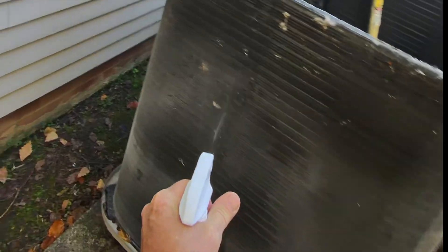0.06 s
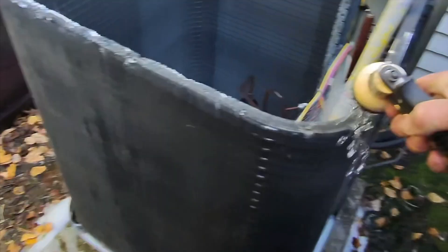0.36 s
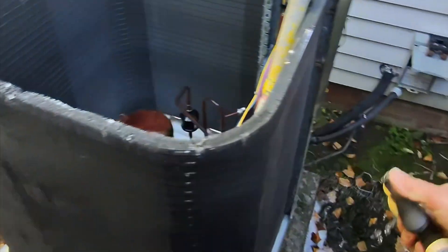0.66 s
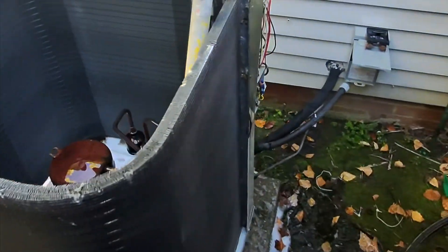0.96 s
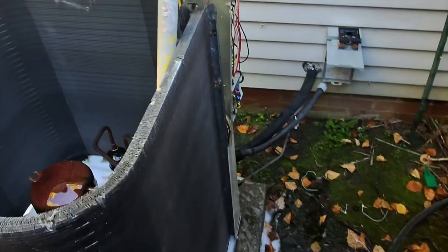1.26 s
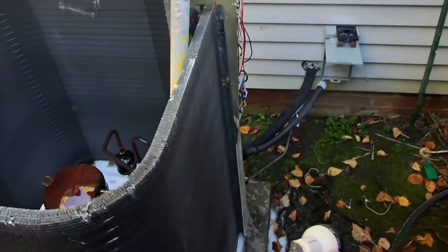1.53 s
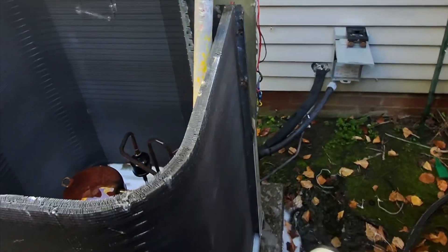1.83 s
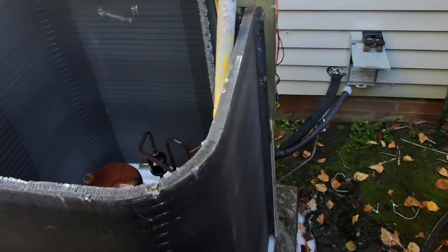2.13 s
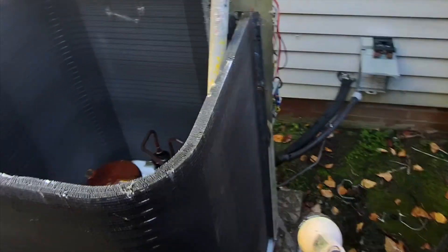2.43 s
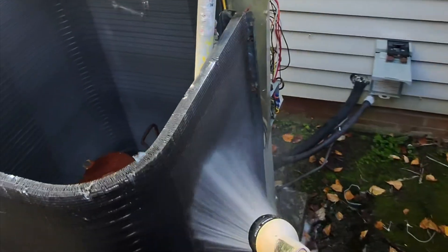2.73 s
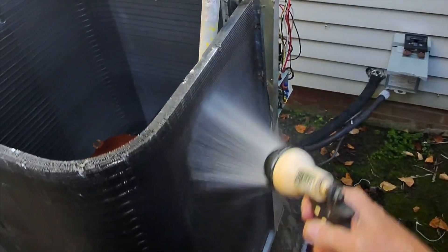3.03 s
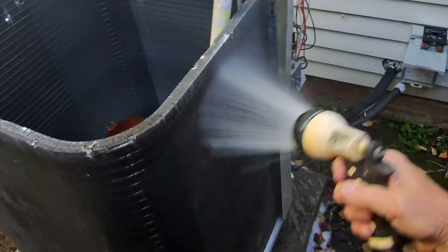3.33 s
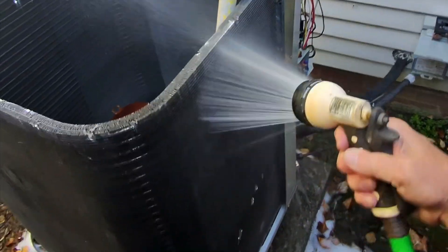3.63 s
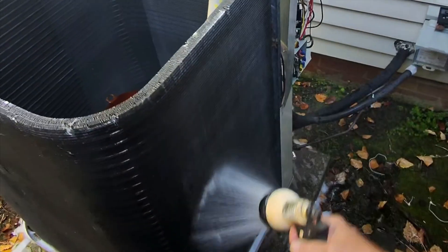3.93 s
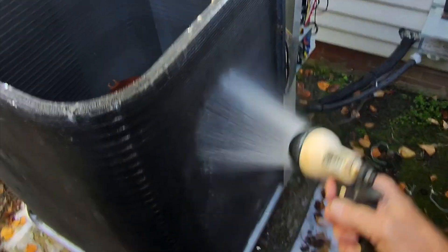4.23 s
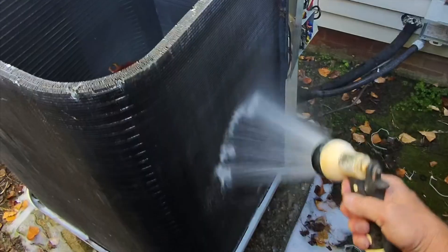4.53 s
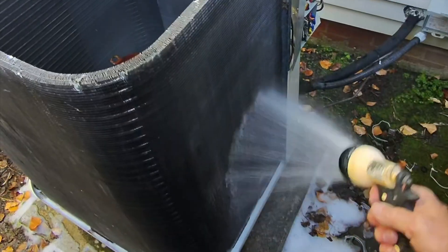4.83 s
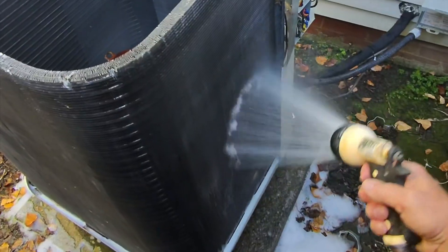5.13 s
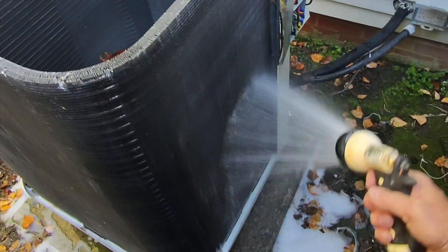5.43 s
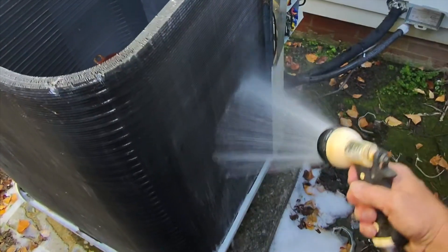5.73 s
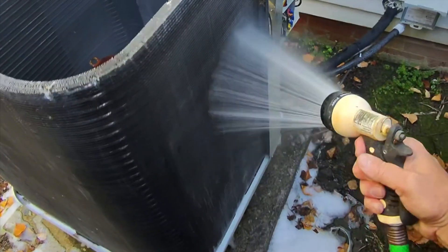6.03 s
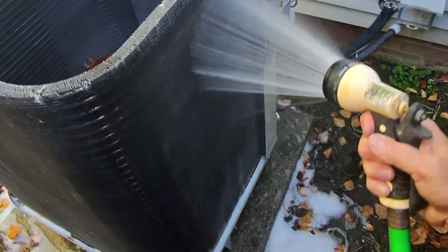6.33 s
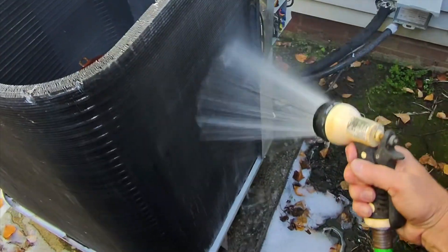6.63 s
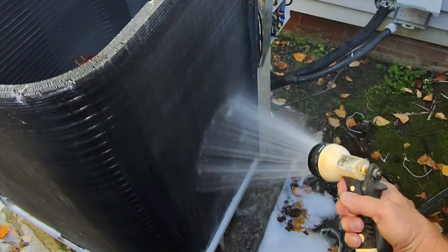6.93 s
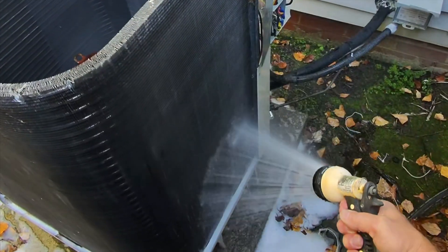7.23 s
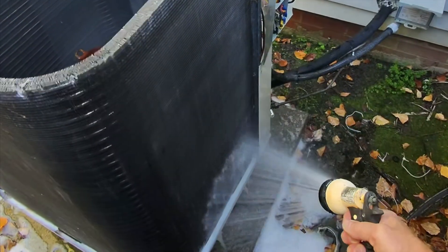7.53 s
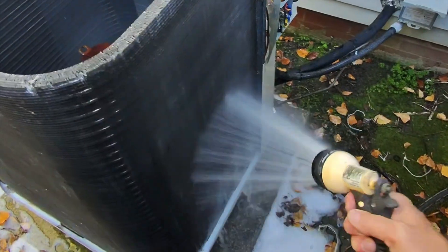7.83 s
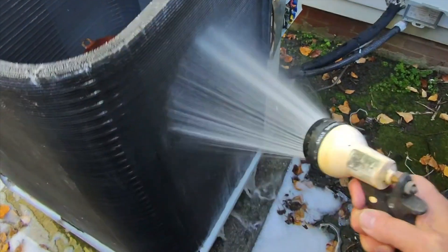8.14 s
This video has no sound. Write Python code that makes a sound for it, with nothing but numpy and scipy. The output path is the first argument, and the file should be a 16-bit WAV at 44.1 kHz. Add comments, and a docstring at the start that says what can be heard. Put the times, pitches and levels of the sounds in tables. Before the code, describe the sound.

A spray bottle sputters twice, water drips, then a garden hose nozzle hisses steadily against the metal fins of an air conditioner coil.

```python
"""A trigger bottle sputters cleaner onto an outdoor air conditioner coil in two squeezes.
The wet coil and the shut hose nozzle trickle and drip; the nozzle knocks as it is picked up.
Then it opens and its fan of water sweeps the thin metal fins, swelling as it strikes them harder:
drops drum, splash and atomise, and the coil rings with a hollow note.
Behind it all, an autumn yard: crickets' wing strokes and a distant rumble."""
import sys
import numpy as np
from scipy import signal
from scipy.fft import rfft, irfft, next_fast_len
from scipy.io import wavfile
from scipy.ndimage import uniform_filter1d

SR = 44100
rng = np.random.default_rng(int(sys.argv[2]) if len(sys.argv) > 2 else 0)


def unload_wav(signal):
    """Save mono or channel-first audio to the path in sys.argv[1] as 16-bit WAV at rate SR, clipped to [-1, 1]."""
    wavfile.write(
        sys.argv[1],
        SR,
        np.round(np.clip(np.atleast_2d(signal).T, -1, 1) * 32767).astype(np.int16),
    )


N = 364707

# Noise spectra: f/Hz, relative density/dB
YARD_SPECTRUM = [(15, -42), (25, -26), (40, -24), (62, -2.5), (85, -0.5), (150, -1), (200, -10),
                 (270, -6.5), (380, -8.5), (500, -10.5), (900, -14), (1400, -17), (2000, -27), (5000, -28),
                 (15000, -55)]
TRICKLE_SPECTRUM = [(700, -22), (2000, -14.5), (3000, -8.5), (4600, -4.5), (5500, -3), (6700, 1.5),
                    (7400, -4.5), (8300, -12), (12000, -19.5), (16000, -19.5)]
BOTTLE_SPECTRUM = [(300, -16), (900, -12), (1150, -5), (1330, -3), (1600, -1.5), (2400, -8), (3100, 0.5),
                   (4700, -6), (6800, 5), (8400, -11), (12000, -15), (16000, -25)]
SPIT_SPECTRUM = [(500, -14), (1500, -3.5), (3000, -6), (5000, -10), (6900, 5.5), (8500, -3), (12000, -8.5),
                 (16000, -10)]
ROAR_SPECTRUM = [(300, -39), (900, -39), (1400, -12), (1700, -3), (2200, -0.5), (2500, 0.5), (2900, -2),
                 (3400, 1), (4200, -2), (5100, -12), (7000, -12.5), (12000, -45)]
SIZZLE_SPECTRUM = [(1500, -26.5), (3500, -16), (4700, -7.5), (5200, -7), (5700, -1), (6150, -2), (6600, .5),
                   (7400, -3), (8200, -14), (9300, -15), (12000, -21), (16000, -35)]
MIST_SPECTRUM = [(4000, -7.5), (7500, 5.5), (9200, 3), (11000, 0.5), (12200, 0.5), (13500, 3.5),
                 (14900, 3.5), (16000, 3)]
SKIM_SPECTRUM = [(2000, -27.5), (3600, -4.5), (4500, 2), (5200, 3.5), (6200, -11), (9000, -27)]
PATTER_SPECTRUM = [(100, -23), (260, -20), (370, -1), (520, -10.5), (700, -2.5), (850, 1), (1400, 4.5),
                   (2500, -17), (6000, -32)]
# Left-right likeness: f/Hz, correlation
YARD_CORRELATION = [(60, 0.98), (130, 0.95), (290, 0.85), (640, -0.25), (1400, -0.048), (15000, 0)]
JET_CORRELATION = [(60, 0.5), (130, 0.93), (290, 0.85), (640, 0.87), (1410, 0.68), (3100, 0.53),
                   (6820, 0.37), (15000, 0.083)]
# Cricket trills: stroke rate/Hz, top f/Hz, end f/Hz, level/dB, start t/s
CRICKET_TRILLS = [(27, 5720, 5380, -51.5, .38), (27, 6450, 6130, -52.5, .38), (9.2, 4900, 4740, -60.5, .38),
                  (31, 6950, 6500, -60, 0)]
# Far cricket's chirps: t/s, level/dB
CRICKET_CHIRPS = [(.062, -49.5), (.172, -51.5), (1.365, -53.5), (1.575, -50), (1.68, -54.5), (1.885, -49.5),
                  (1.99, -49.5)]
# Clear drips: t/s, level/dB, f/Hz
CLEAR_DRIPS = [(.0207, -40, 1580), (0.0405, -35.5, 1490), (0.21, -41.5, 2900), (.508, -44, 3740),
               (.577, -43, 3050), (.6464, -45, 3350), (1.4097, -41.5, 2700), (1.6142, -41, 3260),
               (1.678, -42, 2870), (1.7233, -43, 3660), (1.844, -43, 3600), (1.9385, -42.5, 3690)]
# Nozzle modes: f/Hz, level/dB, t60/s
NOZZLE_MODES = [(335, -34, .025), (720, -49, .025), (1340, -43, .03), (2350, -43, .028)]
# Trigger squeezes: start t/s, hardest t/s, end t/s, first gap/s, top spurt gain/dB, mist level/dB
TRIGGER_SQUEEZES = [(.0024, 0, 0.042, .019, -22, -43), (0.2347, 0.343, .368, .0123, -17.5, -46)]
# Force of the sweeping jet on the fins: t/s, level/dB
JET_STRIKE = [(2.15, -32.5), (2.67, -27), (2.77, -32), (2.91, -27.5), (3.09, -30.5), (3.21, -27.5),
              (3.43, -30.0), (3.59, -34.5), (3.85, -25.5), (4.05, -29), (4.19, -33.0), (4.29, -33),
              (4.45, -29), (4.57, -28), (4.83, -33), (5.13, -27.5), (5.33, -31.0), (5.73, -27.5),
              (6.07, -27.5), (6.51, -32.0), (7.21, -35.0), (7.31, -32.5), (7.41, -28), (7.89, -30.5),
              (8.13, -35), (8.27, -35.5)]
# Jet parts by name: base level/dB, slope/(dB per dB of strike), grazing offset/dB
JET_PARTS = {"roar": (-33.5, 1.16, -2.1), "sizzle": (-33, 1.0, -1.5), "skim": (-41, 0.46, 6),
             "ring": (-32, 0.89, 1), "undertone": (-66, 0, 5.9), "patter": (-51, -0.13, -1.2)}
# Tilt from roar towards sizzle: t/s, level/dB
SIZZLE_TILT = [(2.15, .8), (3.1, -2), (3.42, 0), (3.7, -2), (4.05, 0.8), (4.55, 1.2), (5.4, -0.1),
               (6.9, 0.5), (7.42, 1.3), (7.6, -0.8), (8.27, -0.5)]
# Fine mist: t/s, relative level/dB
MIST_CURVE = [(2.15, -42), (2.33, -37), (2.73, -44), (3.27, -47), (3.43, -38.5), (3.53, -43.5),
              (3.69, -40.5), (3.79, -44.5), (4.13, -41.5), (4.21, -44.5), (5.87, -46.0), (6.91, -43),
              (8.27, -46.0)]
# Coil's hollow note, shifting as the jet moves: t/s, f/Hz, level/dB
HOLLOW_NOTE = [(2.15, 1190, -50.5), (2.75, 1148, -46.5), (2.92, 1083, -51.5), (3.17, 1083, -47),
               (3.45, 1010, -53.5), (3.75, 1113, -50.5), (4.25, 1070, -50), (4.52, 1095, -54),
               (4.8, 1070, -50), (5.2, 1103, -53.5), (6.05, 1095, -53.5), (6.35, 1047, -51.5),
               (6.72, 1118, -48), (7.7, 1126, -52.5), (8.27, 1110, -53)]
# Coil's brighter ring: t/s, relative level/dB
RING_CURVE = [(2.15, -9.5), (2.59, -15), (2.73, -6), (2.97, -14.5), (4.27, -12), (4.71, -15), (5.33, -15.5),
              (5.53, -8.5), (5.67, -10.5), (5.83, -8), (5.93, -10), (7.23, -18), (7.63, -9), (8.27, -22)]
# Panel's low drumming: t/s, relative level/dB
DRUM_CURVE = [(2.15, -75), (2.31, -52.5), (3.07, -56.5), (3.41, -50.5), (4.17, -63), (4.87, -57),
              (5.31, -59.5), (6.17, -52), (6.89, -63.5), (7.37, -51.5), (7.83, -67), (8.27, -74)]
# Microphone port notch: f/Hz, gain/dB
PORT_NOTCH = [(9400, 0), (10000, -5.5), (10400, -11), (10900, -4.5), (11800, 2)]

RUNOFF_S, KNOCK_S, LEAK_S, OPEN_S = .37, 1.532, 2.035, 2.105  # onsets
GRAZE_UNTIL_S, SQUARE_FROM_S = 2.6, 3.8  # the jet turns to face the fins
TIME_S = np.arange(N) / SR


def amp(db):
    """Decibels to gain."""
    return 10 ** (np.asarray(db) / 20)


def unit_rms(x):
    """Scale to rms 1."""
    return x / np.sqrt(np.mean(x ** 2) + 1e-20)


def unit_mid(pair):
    """Scale a stereo pair to mid rms 1."""
    return pair / np.sqrt(np.mean(pair.mean(0) ** 2) + 1e-20)


def at_hz(points, hz):
    """Interpolate over log frequency."""
    f, value = np.transpose(points)
    return np.interp(np.log(hz + 1), np.log(f + 1), value)


def curves(rows):
    """Each value column of a time table, per sample."""
    times_s, *columns = np.transpose(rows)
    return [np.interp(TIME_S, times_s, column) for column in columns]


def add(mix, start_s, sound):
    """Mix a sound in at start_s."""
    part = mix[:, max(round(start_s * SR), 0):][:, :sound.shape[-1]]
    part += sound[..., :part.shape[1]]


def pan(left_db):
    """Left and right gains."""
    return amp([[left_db / 2], [-left_db / 2]])


def colour(pair, spectrum, correlation=None):
    """Filter a pair by a spectrum; optionally correlate its sides."""
    n = pair.shape[1]
    size = next_fast_len(n + 2048)
    hz, z = np.fft.rfftfreq(size, 1 / SR), rfft(pair, size)
    if correlation is not None:
        c = np.clip(at_hz(correlation, hz), -1, 1)
        z = np.array([z[0], c * z[0] + np.sqrt(1 - c ** 2) * z[1]])
    return irfft(z * amp(at_hz(spectrum, hz)), size)[:, :n]


def wobble(rate_hz):
    """Smooth random curve, rms 1."""
    knots = rng.standard_normal(8192)
    return unit_rms(np.interp(TIME_S * rate_hz, np.arange(len(knots)), knots))


def ringing(x, hz, width_hz):
    """Two resonators in series, mid rms 1; hz may be a curve."""
    turn = np.exp(2j * np.pi * np.cumsum(hz * np.ones(x.shape[-1])) / SR)
    pole = np.exp(-np.pi * width_hz / SR)
    for _ in range(2):
        x = 2 * (turn * signal.lfilter([1 - pole], [1, -pole], x / turn + 1e-18)).real
    return unit_mid(x)


def droplets(per_s, spread_db, wash):
    """Tiny uneven impacts over the wash of countless smaller ones."""
    sizes = amp(spread_db * np.minimum(rng.exponential(1, (2, N)), 5))
    hits = sizes * rng.choice([-1, 1], (2, N)) * (rng.random((2, N)) < per_s / SR)
    return unit_rms(unit_rms(hits) + wash * rng.standard_normal((2, N)))


def patchy(pair, brief_db, lasting_db=0.):
    """Water gathers and breaks in brief wide-band patches; struck spots add narrow, longer ones."""
    z = signal.stft(pair, nperseg=512)[2]
    brief, lasting = rng.standard_normal((2,) + z.shape[1:])
    brief = uniform_filter1d(uniform_filter1d(brief, size=6, axis=0), size=6, axis=1)
    lasting = uniform_filter1d(uniform_filter1d(lasting, size=2, axis=0), size=40, axis=1)
    gain = amp(brief_db * unit_rms(brief) + lasting_db * unit_rms(lasting))
    return signal.istft(z * gain, nperseg=512)[1][:, :N]


def yard(level_db=-52):
    """Neighbourhood rumble, nearly alike in both ears."""
    swell = amp(.35 * wobble(3.3))
    rumble = colour(rng.standard_normal((2, N)), YARD_SPECTRUM, YARD_CORRELATION)
    return unit_mid(rumble) * amp(level_db) * swell


def trill(rate_hz, top_hz, end_hz, db, start_s, duty=.75):
    """Cricket wing strokes: each a thin note, falling as the wing slows."""
    strokes = np.cumsum(rate_hz * (1 + .07 * wobble(25))) / SR
    progress = np.minimum(strokes % 1 / duty, 1)
    hz = end_hz + (top_hz - end_hz) * (1 - progress) ** 2 + 40 * wobble(500)
    envelope = np.sin(np.pi * progress) * amp(db + 2.2 * wobble(110))
    return np.sin(2 * np.pi * np.cumsum(hz) / SR) * envelope * (TIME_S > start_s)


def crickets(chirp_hz=5080, scatter_db=-6):
    """Trills and chirps, scattered by house wall and ground."""
    song = np.tile(sum(trill(*row) for row in CRICKET_TRILLS), (2, 1))
    t = np.arange(0, .035, 1 / SR)
    chirp = np.hanning(len(t)) ** .5 * np.sin(2 * np.pi * chirp_hz * t)
    for start_s, db in CRICKET_CHIRPS:
        add(song, start_s, amp(db) * chirp)
    echoes = rng.standard_normal((2, 3000)) * np.exp(-TIME_S[:3000] / .006)
    scattered = signal.fftconvolve(song, echoes, axes=1)[:, :N]
    return song + amp(scatter_db) * unit_rms(scattered) * song.std()


def runoff(gush_db=-52, trickle_db=-51, settle_s=.27, dribble_db=-55.5):
    """Streams gush off the coil and settle to a trickle; the shut nozzle dribbles on the soil."""
    age_s = np.maximum(TIME_S - RUNOFF_S, 0)
    onset = np.minimum(age_s / .017, 1)
    flow = (amp(trickle_db) + amp(gush_db) * np.exp(-age_s / settle_s)) * amp(1.5 * wobble(90))
    water = unit_mid(colour(patchy(droplets(900, 2.0, .98), brief_db=3.5), TRICKLE_SPECTRUM))
    dribble = ringing(droplets(120, 1.7, .26), hz=298, width_hz=120)
    dribble_flow = amp(dribble_db) * np.exp(-.5 * ((TIME_S - .5) / .2) ** 2)
    return onset * (water * flow + dribble * dribble_flow)


def drip(db, hz, tick_db=-8):
    """A short wet plip and a tick of splash, slightly off centre."""
    t = TIME_S[:3000]
    burst, splash = rng.standard_normal((2, 2, len(t)))
    plip = ringing(burst, hz, width_hz=.26 * hz) * np.minimum(t / .0019, 1) * np.exp(-t / .0061)
    splash = colour(splash, [(1000, -18), (4000, -9), (6500, 18), (9000, -10), (15000, -15)])
    tick = unit_mid(splash) * np.exp(-t / .0055)
    return amp(db) * (plip + amp(tick_db) * tick) * pan(rng.normal(0, 2.5))


def drips(faint_per_s=4, faint_db=-52, faint_hz=3700):
    """Clear drips, plus faint random ones while the nozzle is shut."""
    out = np.zeros((2, N))
    for start_s, db, hz in CLEAR_DRIPS:
        add(out, start_s, drip(db, hz))
    for slot_s in np.arange(RUNOFF_S, OPEN_S, 1 / faint_per_s):
        start_s = slot_s + rng.random() / faint_per_s
        add(out, start_s, drip(faint_db + rng.normal(0, 1.8), faint_hz * np.exp(rng.normal(0, .1))))
    return out


def knock():
    """Damped modes of the plastic nozzle as it is picked up."""
    out, t = np.zeros((2, N)), TIME_S[:SR // 5]
    for hz, db, t60_s in NOZZLE_MODES:
        add(out, KNOCK_S, amp(db - 60 * t / t60_s) * np.sin(2 * np.pi * hz * t))
    return out


def spurt(spit_db=-7.6, spatter_db=-19):
    """One bottle spurt: soft puff, sharp spit, short spatter."""
    t = np.arange(-.006, .04, 1 / SR)
    age_s = np.maximum(t, 0)
    spit = np.minimum(age_s / .00025, 1) * np.exp(-np.maximum(age_s - .001, 0) / .00072)
    spatter = (t > -.0035) * np.exp(-age_s / .0097)  # early start gives the puff
    sharp, soft = rng.standard_normal((2, 2, len(t)))
    return (amp(spit_db) * spit * unit_mid(colour(sharp, SPIT_SPECTRUM))
            + amp(spatter_db) * spatter * unit_mid(colour(soft, BOTTLE_SPECTRUM)))


def bottle(foam_db=-56.5, gap_growth_s=.00193, build_db_per_s=100, slack_db_per_s=230):
    """Squeezes blow mist and stutter, slower and harder until the finger slackens; foam fizzes between."""
    spurts = np.zeros((2, N))
    flow = amp(foam_db) * (TIME_S < RUNOFF_S)
    for start_s, hardest_s, end_s, gap_s, top_db, mist_db in TRIGGER_SQUEEZES:
        rise = np.clip((TIME_S - start_s) / .03 + .5, 0, 1)
        fall = np.exp(-np.maximum(TIME_S - end_s, 0) / .018)
        flow = np.maximum(flow, amp(mist_db) * rise * fall)
        at_s = start_s
        while at_s < end_s:
            db = top_db - max(build_db_per_s * (hardest_s - at_s), slack_db_per_s * (at_s - hardest_s))
            add(spurts, at_s - .0055, amp(db) * spurt())
            at_s += gap_s
            gap_s += gap_growth_s
    fizz = unit_mid(colour(droplets(4600, 2.5, .75), BOTTLE_SPECTRUM))
    return (spurts + flow * fizz) * pan(1.9)


def coil(gain, ring_hz=1784, drum_hz=286, undertone_ratio=.625):
    """Drops drive the coil and panel resonances; the coil's pitches shift as the jet moves."""
    hollow_hz, hollow_db = curves(HOLLOW_NOTE)
    ring_bend = (hollow_hz / hollow_hz.mean()) ** .37
    drive = colour(droplets(4000, 2.1, .63), [(100, 8), (1400, -20.5), (4000, 13)], JET_CORRELATION)
    hollow = ringing(drive, hollow_hz, width_hz=128) * amp(hollow_db + wobble(9))
    undertone = ringing(drive, undertone_ratio * hollow_hz, width_hz=33) * gain["undertone"]
    ring = ringing(drive, ring_hz * ring_bend, width_hz=280) * gain["ring"] * amp(curves(RING_CURVE)[0])
    drum = ringing(drive, drum_hz, width_hz=156) * amp(curves(DRUM_CURVE)[0] - .5)
    return hollow * pan(-5) + undertone + ring * pan(7.2) + drum


def jet_band(drops, spectrum):
    """Drop noise with the jet's stereo width, mid rms 1."""
    return unit_mid(colour(drops, spectrum, JET_CORRELATION))


def jet(usual_strike_db=-30, opening_s=.041, leak_db=-12):
    """The fan of water drums on the fins, splashes and atomises; the coil resonates."""
    strike_db = curves(JET_STRIKE)[0] - usual_strike_db
    grazing = np.clip((SQUARE_FROM_S - TIME_S) / (SQUARE_FROM_S - GRAZE_UNTIL_S), 0, 1)
    gain = {name: amp(db + slope * strike_db + graze_db * grazing)
            for name, (db, slope, graze_db) in JET_PARTS.items()}
    valve = np.clip((TIME_S - OPEN_S) / opening_s, 0, 1)
    leak = amp(leak_db) * np.clip((TIME_S - LEAK_S) / opening_s, 0, 1)  # thin mist escapes first
    tilt = amp(curves(SIZZLE_TILT)[0] / 2)
    impacts = patchy(droplets(5000, 2.5, .99), brief_db=1.1, lasting_db=1.35)
    splash = patchy(droplets(7000, 2.6, .91), brief_db=.3, lasting_db=2.9)
    roar = jet_band(impacts, ROAR_SPECTRUM) * gain["roar"] / tilt
    sizzle = jet_band(splash, SIZZLE_SPECTRUM) * gain["sizzle"] * tilt
    mist = jet_band(droplets(9000, 3.3, 1.0), MIST_SPECTRUM) * amp(curves(MIST_CURVE)[0] + 5)
    skim = jet_band(droplets(7000, 2.1, .75), SKIM_SPECTRUM) * gain["skim"]
    patter = jet_band(droplets(1500, 3.7, .93), PATTER_SPECTRUM) * gain["patter"]
    metal = coil(gain)
    flutter = amp(.38 * wobble(60))  # the water sheet breaks up unevenly
    spray = valve * (roar + sizzle + skim) + np.maximum(valve, leak) * mist
    return flutter * spray + valve * (patter + metal)


def scene():
    """Sum of all sources."""
    return jet() + bottle() + runoff() + drips() + knock() + crickets() + yard()


def record(dry):
    """Microphone port notch, then band limit."""
    cutoff_hz = 15600
    lowpass = signal.firwin(601, cutoff_hz, window=("kaiser", 9), fs=SR)
    return signal.oaconvolve(colour(dry, PORT_NOTCH), lowpass[None], "same", axes=1)


dry = scene()
out = record(dry)
unload_wav(out)
```